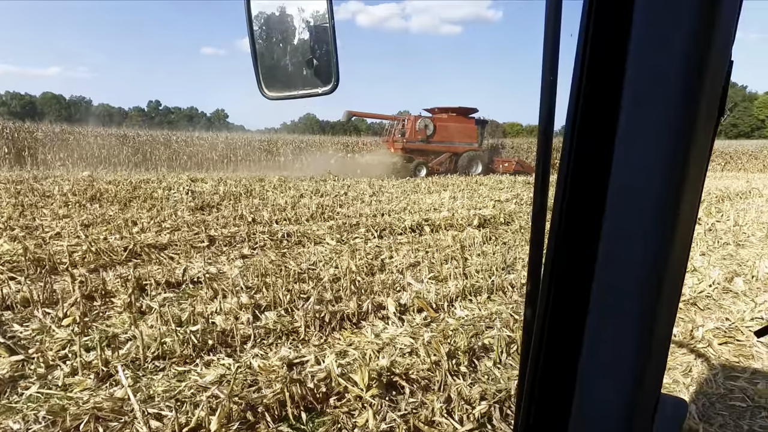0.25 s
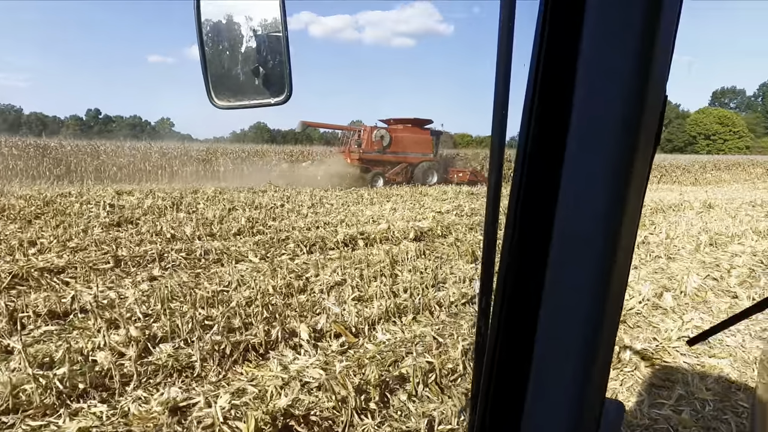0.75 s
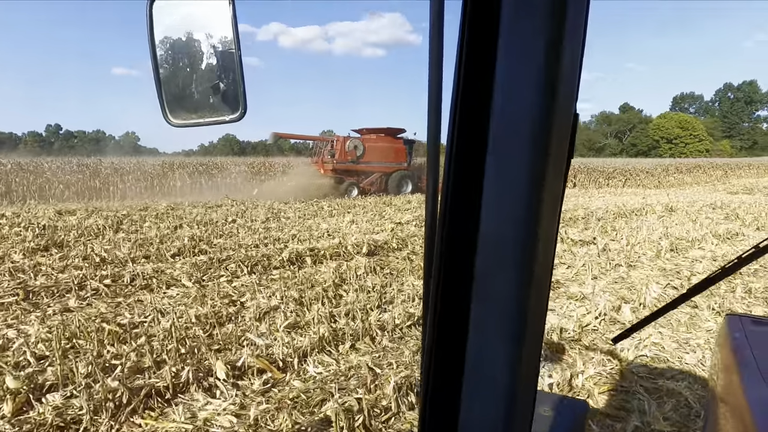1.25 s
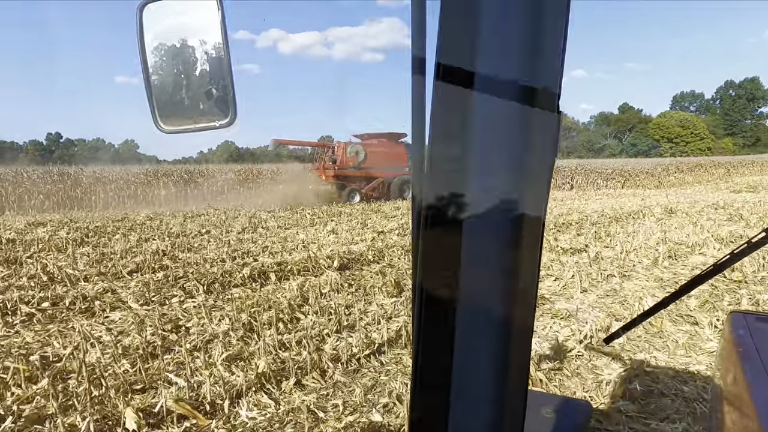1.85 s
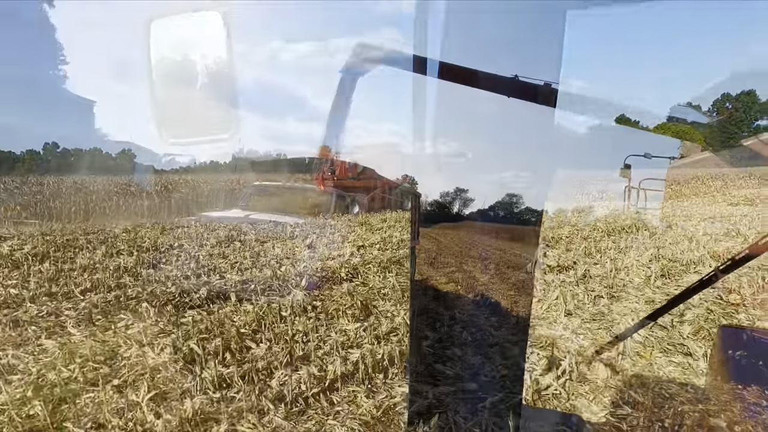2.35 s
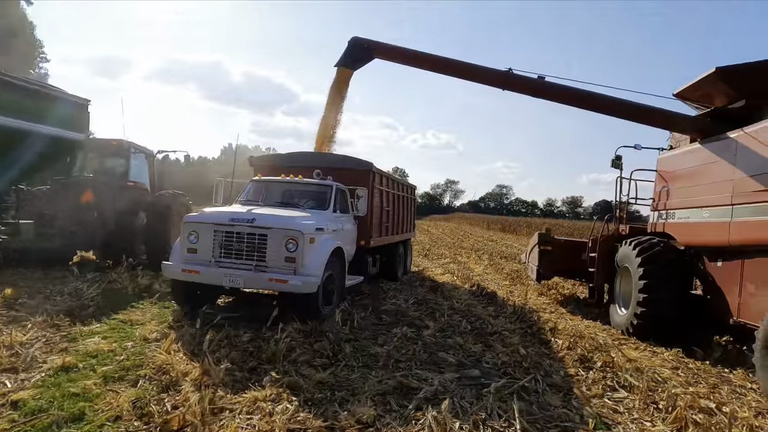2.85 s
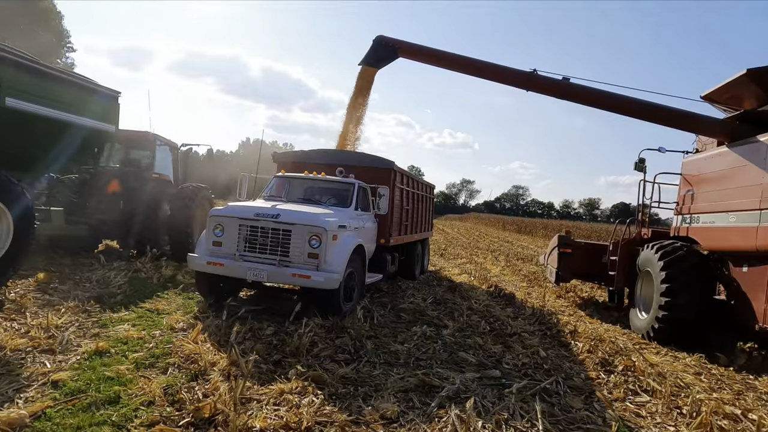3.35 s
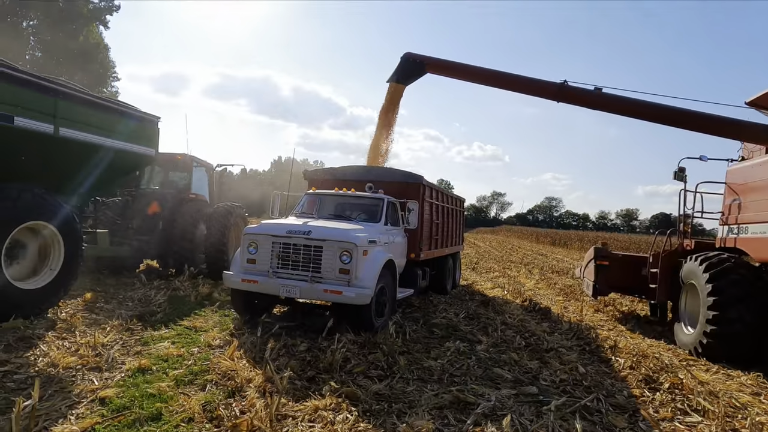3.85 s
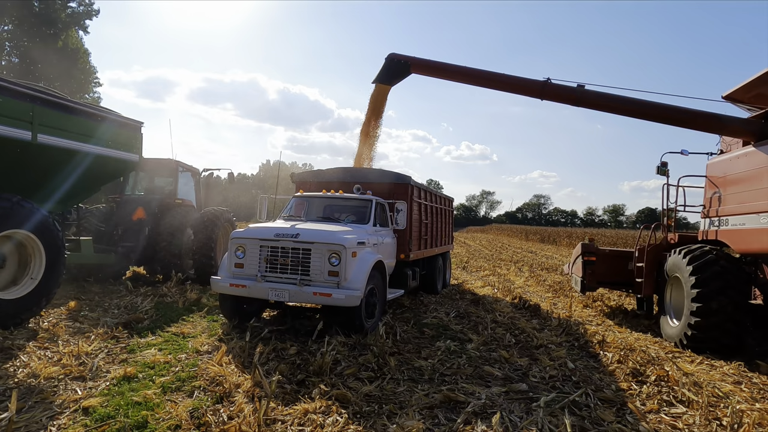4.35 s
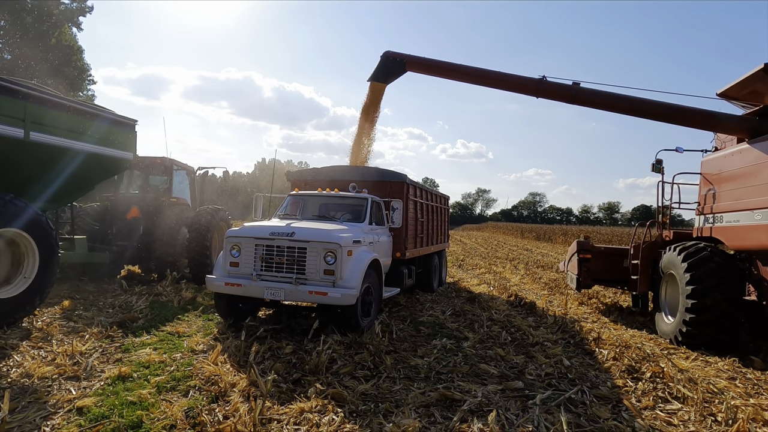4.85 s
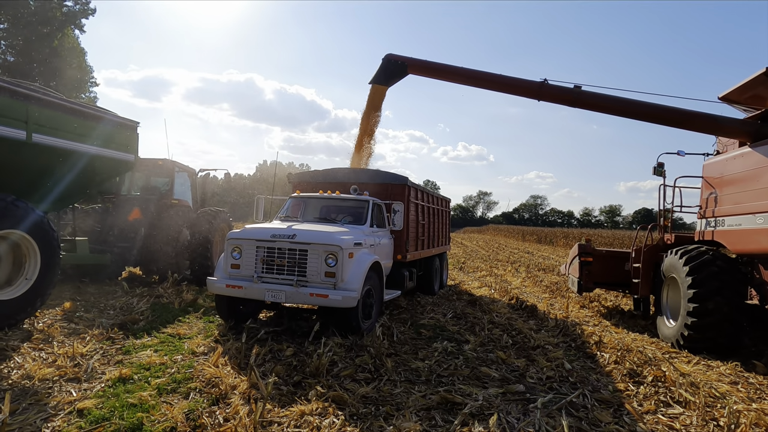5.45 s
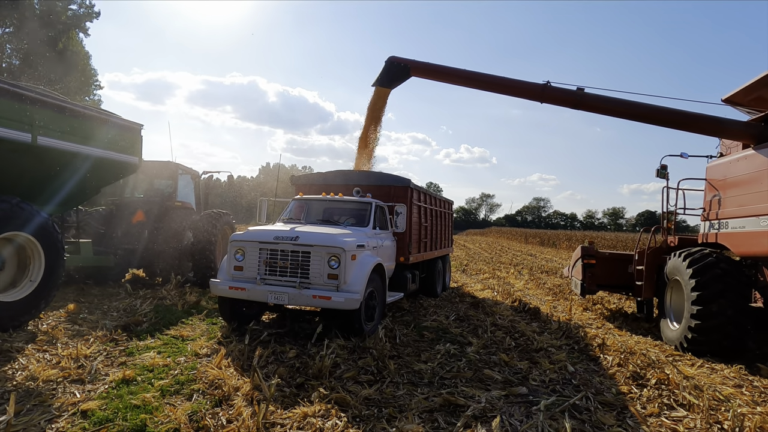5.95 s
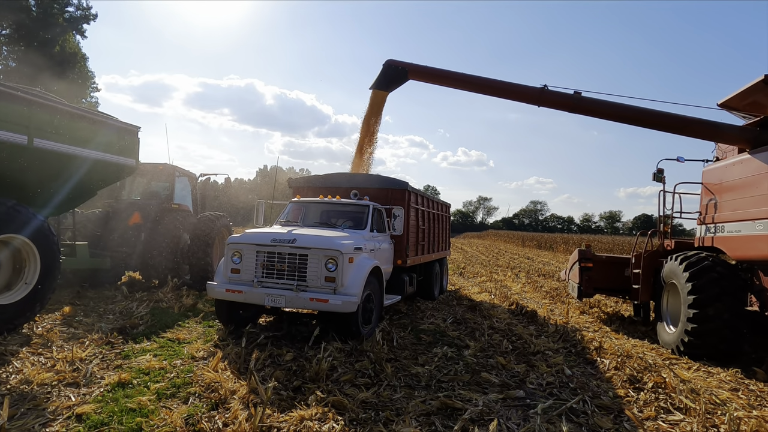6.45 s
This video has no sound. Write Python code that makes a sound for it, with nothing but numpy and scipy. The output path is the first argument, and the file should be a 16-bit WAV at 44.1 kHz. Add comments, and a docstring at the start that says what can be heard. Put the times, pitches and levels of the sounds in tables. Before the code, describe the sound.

Inside a tractor cab, a six-cylinder diesel booms low and steady with dull knocking, a wavering gear whine and rumbling jolts from the ground. At around two seconds it crossfades into an open field: a combine's throbbing engine and rotor hum over broad machine roar, while maize pours in a dense, crisp hiss into a truck. Close stereo microphone; the field view gradually widens.

```python
"""From a tractor cab to a combine at work

A six-cylinder diesel tractor drones in its cab: sine tones boom at multiples of the engine cycle,
noise bursts knock at each firing, gear and pump tones whine, and low noise makes the rumble of the ride.
The cab fades into the open field, where a combine's engine beats against its fast rotor, its drives whine
and noise roars beneath. Thousands of tiny random ticks make maize pour from the auger into a truck."""
import sys
import numpy as np
from scipy import signal
from scipy.fft import rfft, irfft, next_fast_len
from scipy.io import wavfile
from scipy.ndimage import uniform_filter1d, map_coordinates

SR = 44100
rng = np.random.default_rng(int(sys.argv[2]) if len(sys.argv) > 2 else 0)


def wrap_up_sound(samples):
    """Save the sound to the file named by the first command line argument, as 16-bit audio."""
    columns = np.atleast_2d(samples).T
    # keep every value between -1 and 1, then stretch to whole-number steps
    tamed = np.clip(columns, -1, 1)
    steps = np.round(tamed * 32767).astype(np.int16)
    wavfile.write(sys.argv[1], SR, steps)


N = 295029
TIME = np.arange(N) / SR  # seconds

# four-stroke engine cycles per second (Hz); each cycle holds six firings
TRACTOR_CYCLE_HZ, COMBINE_CYCLE_HZ = 17.635, 14.213
# the field starts to fade in (s)
FIELD_IN_S = 1.945

# How hard the tractor's gears work. Each row: time in seconds, level of the gear whine in dB rms.
GEAR_LOAD_CURVE = [(0, -34.5), (.35, -38), (.9, -35.5), (1.45, -31), (1.75, -32), (2, -34)]


def undb(db):
    """Turn decibels into a gain."""
    return 10 ** (np.asarray(db) / 20)


def unit(x):
    """Scale to rms 1."""
    return x / np.sqrt(np.mean(x ** 2))


def curve(table):
    """Join the rows (time, value) by straight lines."""
    seconds, values = np.transpose(table)
    return np.interp(TIME, seconds, values)


def fade(start, end):
    """A straight ramp from 0 to 1 between two times in seconds."""
    return np.clip((TIME - start) / (end - start), 0, 1)


def walk(rate):
    """Smooth random drift with spread near 1 and about `rate` turns a second."""
    knots = rng.standard_normal(int(rate * N / SR) + 3)
    joined = np.interp(TIME * rate + rng.random(), np.arange(len(knots)), knots)
    # the factor makes up for the spread lost in smoothing
    return 1.298 * uniform_filter1d(joined, int(SR / rate / 2))


def shape(x, gain):
    """Filter by a gain that is a function of frequency."""
    size = next_fast_len(N, True)
    hz = np.maximum(np.arange(size // 2 + 1) * SR / size, 1)
    return irfft(rfft(x, size) * gain(hz), size)[..., :N]


def colour(x, spectrum):
    """Give a white sound of rms 1 a spectrum in dB per Hz, with straight lines over log frequency."""
    hz, db = np.transpose(spectrum)
    return shape(x, lambda f: undb(np.interp(np.log(f), np.log(hz), db)) * np.sqrt(SR / 2))


def stereo(mid, side):
    """Left and right from what they share (mid) and how they differ (side)."""
    return np.array([mid + side, mid - side])


def tones(phase, lines, waver_db, rate):
    """Sine tones (multiple of the phase in turns, dB rms), each wavering in level by itself."""
    total = 0
    for multiple, db in lines:
        sine = np.sin(2 * np.pi * (multiple * phase + rng.random()))
        total = total + undb(db + waver_db * walk(rate)) * sine
    return np.sqrt(2) * total


def hunting(wander, rate):
    """Turns per Hz of a governed shaft whose speed hunts a little."""
    return np.cumsum(1 + wander * walk(rate)) / SR


def knock(cycle, cycle_hz, repeat, depth, uneven_db, cylinders=6):
    """White noise that jumps at each firing and dies away; a share of it repeats with every cycle."""
    size = int(SR / cycle_hz)
    pattern = unit(irfft(np.exp(2j * np.pi * rng.random(size // 2)), size))
    repeating = map_coordinates(pattern, [cycle % 1 * size], order=3, mode="grid-wrap")
    mixed = np.sqrt(repeat) * repeating + np.sqrt(1 - repeat) * rng.standard_normal(N)
    firings = cycle * cylinders
    strengths = undb(uneven_db * rng.standard_normal(cylinders))
    strength = strengths[firings.astype(int) % cylinders]
    burst = 1 + depth * strength * np.exp(-3 * (firings % 1))
    return unit(burst * mixed)


def tractor_cab():
    """The firing rate booms in the cab; knock and whines come off the glass from all sides."""
    cycle = TRACTOR_CYCLE_HZ * hunting(wander=0.000624, rate=4.04)
    low = tractor_boom(cycle) + ride()
    # separate random draws for the direct and the reflected sound
    direct, reflected = (cab_knock(cycle) * undb(-0.82 + .5 * walk(9.37)) for _ in range(2))
    whine, whine_echo = (gear_whine() + pump_whines() for _ in range(2))
    # the boom reaches the left a moment after the right
    lag = 0.32 * (np.roll(low, 1) - low)
    side = undb(-28.0) * low + lag + undb(-9.5) * reflected + undb(-8.5) * whine_echo
    return stereo(low + direct + whine, side)


def tractor_boom(cycle):
    """Tones locked to whole multiples of the engine cycle; the sixth is the firing rate."""
    # The tractor engine's tones. Each row: multiple of the cycle rate, level in dB rms.
    boom_tones = [(2, -37), (3, -35), (6, -16.3), (7, -29), (9, -35), (10, -32), (11, -42), (12, -36),
                  (13, -42), (14, -44), (16, -48), (17, -44.5), (20, -45.5), (24, -36.5), (28, -48),
                  (32, -42.5), (33, -44), (34, -50), (36, -50), (38, -48), (40, -49), (65, -48),
                  (69, -49.5), (70, -51), (74, -46.5), (75, -52), (76, -50.5)]
    return tones(cycle, boom_tones, waver_db=.3, rate=5.6)


def cab_knock(cycle):
    """Diesel knock, a regular chug under looser ticking; the cab dulls it and its panels buzz more under load."""
    # The knock as heard through the cab. Each row: frequency in Hz, level in dB per Hz.
    knock_spectrum = [(150, -75), (300, -63), (450, -60.5), (620, -60), (850, -64.5), (950, -62.5),
                      (1080, -65), (1200, -64), (1500, -69), (2050, -69), (3000, -78), (4300, -80),
                      (7500, -88.5), (9000, -97.5), (12000, -105), (14200, -120), (15000, -140)]
    # Ringing panels and covers. Each row: frequency in Hz, half-width in Hz, lift in dB.
    panels = [(2340, 87, 2), (2695, 34, 5), (3330, 74, 4), (4270, 250, 3.5), (5400, 110, 3.5)]
    chug_top_hz = 1500  # the chug gives way to the ticking here

    def chug_share(f):
        return 1 / (1 + (f / chug_top_hz) ** 6)

    def panel_lift(f):
        return undb(sum(db / (1 + ((f - hz) / width) ** 2) for hz, width, db in panels))

    chug = knock(cycle, TRACTOR_CYCLE_HZ, repeat=.62, depth=0.6, uneven_db=3.5)
    ticking = knock(cycle, TRACTOR_CYCLE_HZ, repeat=.3, depth=0.08, uneven_db=1.5)
    low_part = shape(chug, lambda f: np.sqrt(chug_share(f)))
    high_part = shape(ticking, lambda f: np.sqrt(1 - chug_share(f)))
    dull = colour(low_part + high_part, knock_spectrum)
    buzz = shape(dull, panel_lift) - dull
    return dull + buzz * unit(undb(curve(GEAR_LOAD_CURVE) / 2))


def gear_whine():
    """A tone from meshing teeth; the off-centre gear swings its phase and throbs its level once a turn."""
    mesh_hz, shaft_hz = 1023.2, 23.3
    swing, throb, lead_turns = .95, .24, .16  # phase swing in radians, share of level, turns ahead
    shaft = hunting(wander=0.0009, rate=3)
    turn = 2 * np.pi * (shaft_hz * shaft + rng.random())
    mesh = np.sin(2 * np.pi * (mesh_hz * shaft + rng.random()) + swing * np.sin(turn))
    throbbing = 1 + throb * np.cos(turn + 2 * np.pi * lead_turns)
    whine = unit(mesh * throbbing * undb(1.1 * walk(25)))
    return undb(curve(GEAR_LOAD_CURVE)) * whine


def pump_whines():
    """Tones of the pump and gearbox; each swells once and sinks back as the load shifts."""
    # Swelling whines. Each row: frequency in Hz, time of the top in seconds, level there in dB rms,
    # fall one second away in dB.
    swelling_whines = [(1234, .4, -49, 4), (1523, 1.5, -51, 8), (1817, .7, -54, 8), (1904.5, .95, -43.4, 8),
                       (2042, 1.7, -51, 12), (2071, 1.6, -52, 12), (2116, .5, -54, 10), (2276, .9, -53, 2),
                       (2455, 1.5, -57, 6), (2682, 1.4, -55, 4)]
    shaft = hunting(wander=.0014, rate=14)
    total = 0
    for hz, top_s, db, fall_db in swelling_whines:
        swell = undb(-fall_db * (TIME - top_s) ** 2)
        total = total + swell * tones(hz * shaft, [(1, db)], waver_db=2, rate=18)
    return total


def ride():
    """Low noise for the rumble of the wheels; each rut makes the cab shudder on its mounts."""
    # Rumble before its level is set. Each row: frequency in Hz, level in dB per Hz.
    rumble_spectrum = [(8, -50), (20, -42.5), (45, -49), (78, -58), (112, -44), (150, -53.5), (240, -55),
                       (340, -64.5), (700, -110), (3000, -140)]
    # Ruts under the wheels. Each row: time of the middle in seconds, length in seconds, level in dB rms.
    rut_list = [(.2, .13, -21.5), (.82, .11, -23), (1.43, .24, -23), (1.87, .09, -19.5), (2.042, .08, -26)]
    # Rocking of the cab on its mounts. Each row: frequency in Hz, level in dB relative to the others.
    rocking_tones = [(15, -1.5), (23, -3), (36, -4)]
    rumble = colour(rng.standard_normal(N), rumble_spectrum) * undb(-0.5 + 2 * walk(3.8))
    jolt = sum(undb(db) * np.exp(-(2 * (TIME - s) / length) ** 2) for s, length, db in rut_list)
    rocking = unit(tones(hunting(wander=.12, rate=14), rocking_tones, waver_db=2.5, rate=11))
    return rumble + jolt * rocking


def combine():
    """The engine's second firing harmonic throbs against the rotor; fans and sieves roar beneath."""
    # The clatter of the engine and its echo. Each row: frequency in Hz, level in dB per Hz before level changes.
    clatter_spectrum = [(300, -77), (600, -58.5), (780, -61.5), (870, -65), (1300, -69), (1700, -68.5),
                        (2200, -75.5), (4000, -83.5), (9000, -124)]
    cycle = COMBINE_CYCLE_HZ * hunting(wander=0.000991, rate=5)
    engine = exhaust_drone(cycle) + combine_engine(cycle)
    clatter = combine_clatter(cycle, clatter_spectrum)
    # the truck and the cart throw a little back from the sides, drawn here as steady noise
    echo = undb(side_db() + 2.5) * colour(rng.standard_normal(N), clatter_spectrum)
    return stereo(engine + rotor_and_drives() + clatter + threshing_roar(), echo)


def exhaust_drone(cycle):
    """Twice the firing rate; a slightly lower, weaker hum drifts in and out of step with it."""
    drone_db, hum_db = -21.1, -29  # dB rms
    beat_hz, in_step_s = 1.09, 3.71  # rate of the drift, a moment when both are in step
    turns = 12 * cycle
    slip = beat_hz * (TIME - in_step_s)
    drone = undb(drone_db) * np.sin(2 * np.pi * turns)
    hum = undb(hum_db) * np.sin(2 * np.pi * (turns - slip))
    return np.sqrt(2) * (drone + hum)


def combine_engine(cycle):
    """Tones locked to whole multiples of the combine's engine cycle."""
    # The combine engine's tones. Each row: multiple of the cycle rate, level in dB rms.
    engine_tones = [(6, -26), (8, -46), (15, -42), (18, -44), (19, -44), (40, -49), (41, -50), (42, -48),
                    (44, -51), (63, -53), (65, -52), (68, -53), (84, -54), (88, -55), (90, -58), (93, -57),
                    (102, -59), (117, -59)]
    return tones(cycle, engine_tones, waver_db=.4, rate=5.6)


def rotor_and_drives():
    """A steady rotor tone and wavering drive tones share one belt speed."""
    # Tones of the belts and drives. Each entry: frequency in Hz.
    drive_hz = [72, 114.5, 393, 405, 465, 695]
    # Strength of those tones, in the same order. Each entry: level in dB rms before wavering.
    drive_levels = [-37.5, -40.5, -44, -44.5, -41, -36]
    belt = hunting(wander=0.00074, rate=4.214)
    rotor = tones(belt, [(196.6, -18.9)], waver_db=0.0, rate=4.85)  # Hz, dB rms
    drives = tones(belt, zip(drive_hz, drive_levels), waver_db=2.2, rate=16)
    return rotor + drives


def combine_clatter(cycle, spectrum):
    """Coloured bursts of noise at the engine's firings, rising and falling in level."""
    # How loud the clatter is over time. Each row: time in seconds, level change in dB.
    level_curve = [(2.2, 2.5), (2.8, 1.5), (3.4, 0.1), (4.1, 0), (4.8, -2.5), (5.3, 0.5), (5.85, 2),
                   (6.6, -0.2)]
    bursts = knock(cycle, COMBINE_CYCLE_HZ, repeat=.35, depth=.45, uneven_db=3)
    return colour(bursts, spectrum) * undb(curve(level_curve) + 1.6 * walk(40))


def threshing_roar():
    """Fans and sieves: coloured noise with a slightly wavering level."""
    # The roar before its level is set. Each row: frequency in Hz, level in dB per Hz.
    roar_spectrum = [(15, -73), (42, -47.5), (110, -51.5), (155, -47), (190, -46.5), (235, -43.5),
                     (310, -47), (400, -56), (520, -56.5), (700, -57), (1100, -62.5), (2200, -75.5),
                     (6000, -101)]
    return colour(rng.standard_normal(N), roar_spectrum) * undb(-0.26 + .5 * walk(9.9))


def grain():
    """Kernels hiss onto the heap and ring the truck box; the finest spray is wide and leans right."""
    early_db, settle_s = 2, 1.65  # stronger at first, then settles
    spray_hz = 11300  # the finest spray lies above this
    spray_open_s, opening_db_per_s = 3, 49  # fully open at this time, rate of opening before it

    def above(f):
        return 1 / (1 + (spray_hz / f) ** 20)

    settling = np.exp(-np.maximum(TIME - FIELD_IN_S, 0) / settle_s)
    flow_db = early_db * settling + .2 * walk(2.9)  # slow surging
    spray_db = opening_db_per_s * np.minimum(TIME - spray_open_s, 0)
    stream, scatter = pour(), pour()
    spray, wide = shape(stream, above), shape(scatter, above)
    fine = np.array([0.48 * spray + 0.63 * wide, 1.12 * spray - 0.71 * wide])
    body = stereo(stream - spray, undb(side_db()) * scatter)
    return (body + undb(spray_db) * fine) * undb(flow_db + .3 * walk(11))


def pour():
    """A stream of kernel ticks whose colour shifts as the heap grows under the spout."""
    # Kernels at first. Each row: frequency in Hz, level in dB per Hz before the flow level is set.
    early_spectrum = [(1000, -100), (2350, -73.5), (2900, -74.5), (3700, -72.5), (4700, -72), (5150, -69.5),
                      (5800, -74.5), (7800, -75.5), (10000, -84), (11200, -92.5), (12200, -83),
                      (14000, -93), (15500, -101)]
    # Kernels on the grown heap. Each row: frequency in Hz, level in dB per Hz before the flow level is set.
    late_spectrum = [(700, -95), (1250, -70), (2350, -71), (2900, -73.5), (3700, -70.5), (4700, -68),
                     (5150, -65.5), (5800, -71.5), (7800, -77.5), (10000, -80.5), (11200, -81.5),
                     (11950, -78), (14000, -93), (15500, -102)]
    # When the colour shifts. The two entries: start in seconds, end in seconds.
    growth_times = (4.9, 6.85)
    ticks = impacts(per_second=36000, spread_db=1.0)
    grown = fade(*growth_times)
    return (1 - grown) * colour(ticks, early_spectrum) + grown * colour(ticks, late_spectrum)


def impacts(per_second, spread_db):
    """Countless one-sample ticks of unequal size at random moments."""
    hit = rng.random(N) < per_second / SR
    return unit(hit * rng.standard_normal(N) * undb(spread_db * rng.standard_normal(N)))


def side_db():
    """Level (dB) of how left and right differ in the field; the width stays small, grows until near the end,
    then holds."""
    wide_s, wide_db, growth_db_per_s = 6.37, -14.5, 23
    return wide_db + growth_db_per_s * np.minimum(TIME - wide_s, 0)


def scene():
    """The cab gives way to the open field, which first comes in with a small step."""
    cab_gain = 1 - fade(1.85, 2.85)
    field_gain = fade(FIELD_IN_S, 2.68) * fade(2.04, 2.06)
    return cab_gain * tractor_cab() + field_gain * (combine() + grain())


def record(dry):
    """Filters cut the deepest bass and the top of the treble."""
    bottom_hz, top_hz = 10, 15200
    dry = signal.sosfilt(signal.butter(2, bottom_hz, "high", fs=SR, output="sos"), dry)
    return signal.sosfilt(signal.ellip(10, .1, 80, top_hz, fs=SR, output="sos"), dry)


dry = scene()
out = record(dry)
wrap_up_sound(out)
```